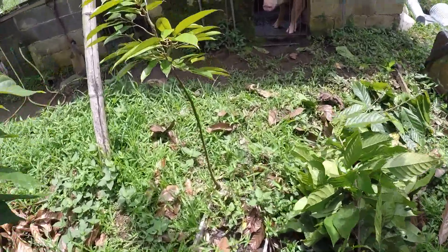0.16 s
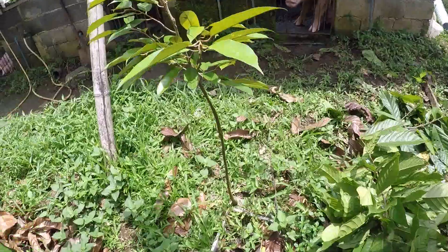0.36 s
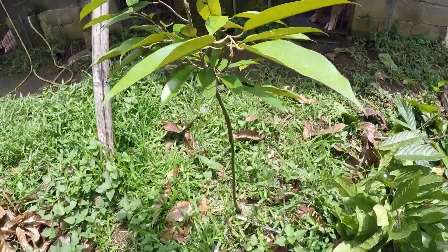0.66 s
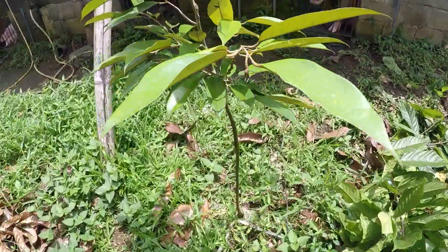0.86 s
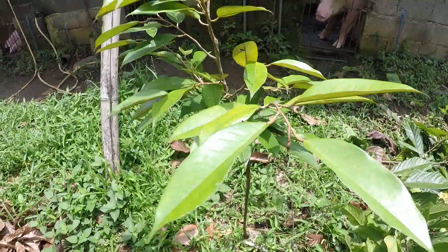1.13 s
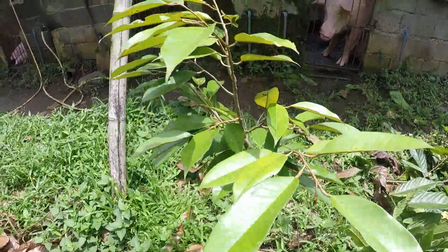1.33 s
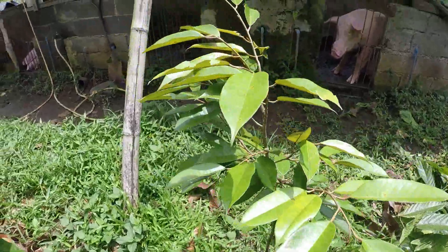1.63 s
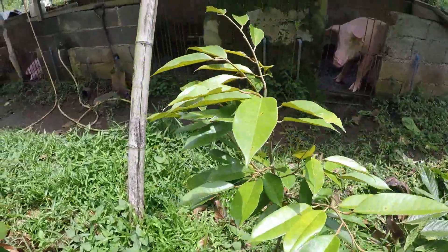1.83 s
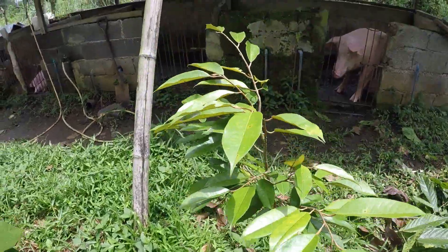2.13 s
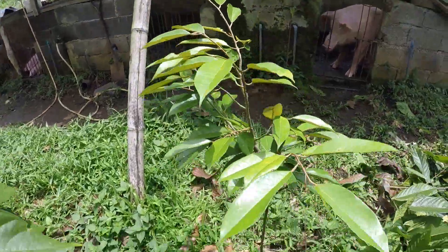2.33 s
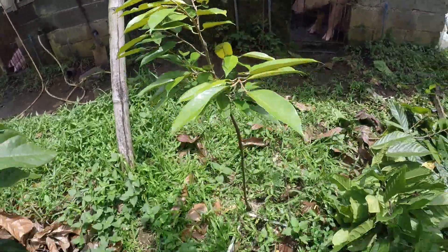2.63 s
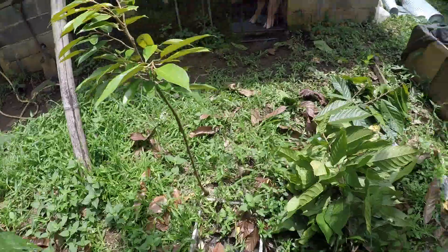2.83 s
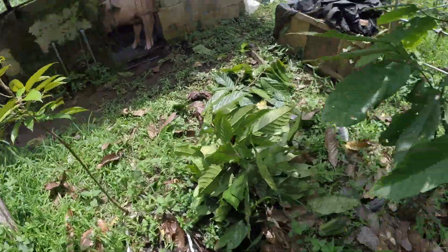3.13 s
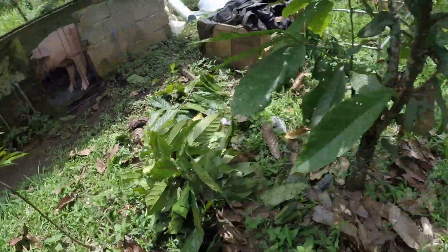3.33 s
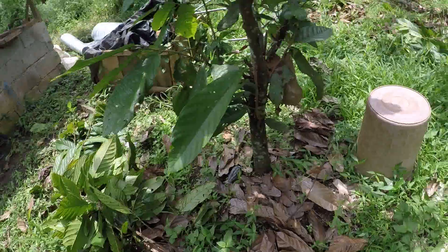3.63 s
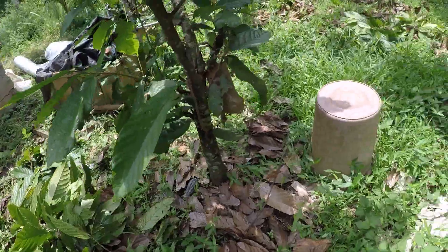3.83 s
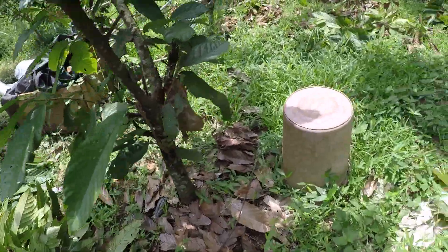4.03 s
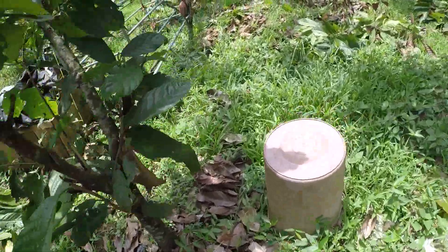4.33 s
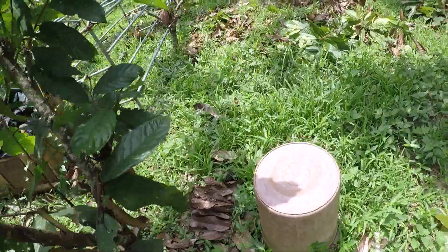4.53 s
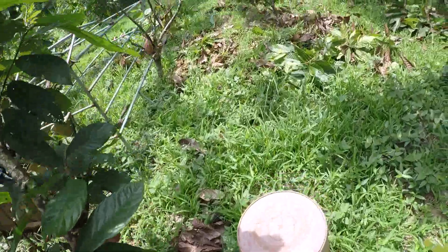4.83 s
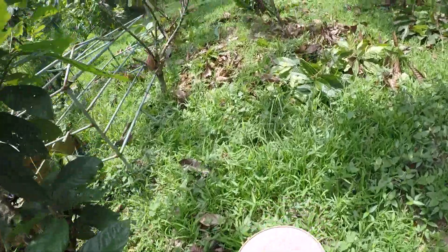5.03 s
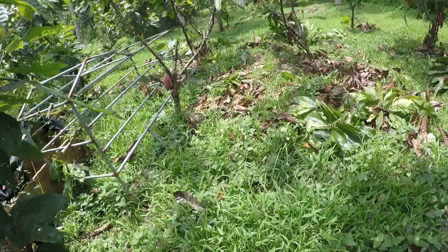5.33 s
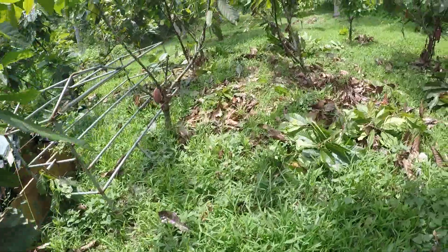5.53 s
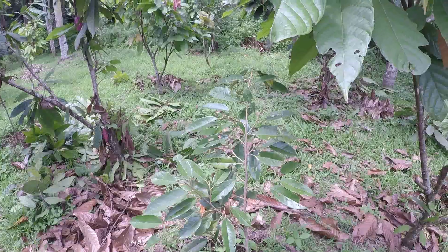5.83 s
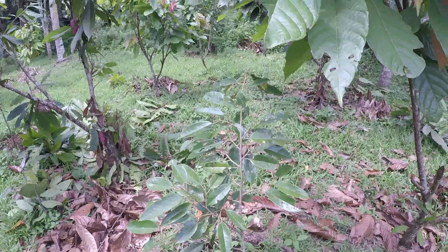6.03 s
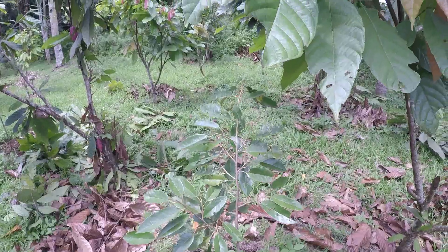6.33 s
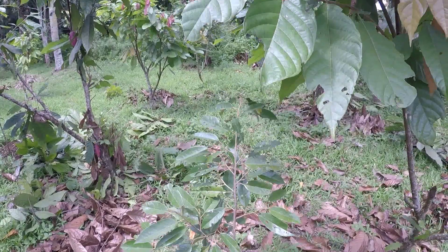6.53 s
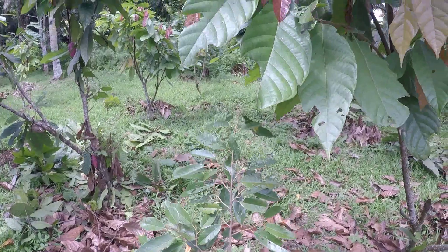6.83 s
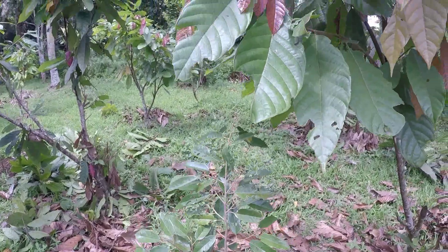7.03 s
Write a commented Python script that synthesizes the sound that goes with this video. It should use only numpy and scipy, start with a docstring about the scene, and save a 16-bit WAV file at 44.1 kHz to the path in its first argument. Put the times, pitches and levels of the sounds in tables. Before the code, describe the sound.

Footsteps rustle and snap through grass and dry leaves under low wind rumble as a pig grunts repeatedly; then an abrupt cut to a quiet grove.

```python
"""Leafy garden walk, a pig in its pen, then a calm grove

Heard close at the two ports of a small hand-held camera: feet stir grass and dry leaves (grainy noise,
bursts for snaps, short rings for ticks), and wind rumbles and thumps (low noise, falling blips).
A pig grunts from its concrete pen (pulse trains through resonances, with echoes; a noise burst adds a knock).
After a cut, a quiet mono grove fades in (two noise bands). Faint far calls are gliding sines."""
import sys
import numpy as np
from scipy import signal
from scipy.fft import rfft, irfft
from scipy.io import wavfile
from scipy.ndimage import uniform_filter1d

SR = 44100
rng = np.random.default_rng(int(sys.argv[2]) if len(sys.argv) > 2 else 0)


def wav_record(signal):
    """Record a signal, one row per channel, as 16-bit PCM in the file named by sys.argv[1]."""
    frames = np.transpose(np.atleast_2d(signal))
    bounded = np.clip(frames, -1, 1)
    # unit amplitude maps onto the largest positive 16-bit level
    quanta = np.round(bounded * 32767).astype(np.int16)
    wavfile.write(sys.argv[1], SR, quanta)


N = 316197
CUT_S = 5.742   # the garden ends and the grove begins


def from_db(db):
    """Gain of a level in dB."""
    return 10 ** (np.asarray(db) / 20)


def rms_one(x):
    """Scaled to rms 1."""
    return x / np.sqrt(np.mean(x ** 2) + 1e-20)


def in_time(rows):
    """One curve per column after the first (seconds), sample by sample."""
    s, *columns = np.transpose(rows)
    return [np.interp(np.arange(N) / SR, s, column) for column in columns]


def on_bins(points):
    """A table over frequency, read at every FFT bin along a log axis."""
    hz, value = np.transpose(points)
    bin_hz = np.arange(N // 2 + 1) * SR / N
    return np.interp(np.log(bin_hz + 1), np.log(hz + 1), value)


def coloured(x, spectrum):
    """Noise shaped by a relative spectrum that keeps the rms of white noise."""
    return irfft(rfft(x) * rms_one(from_db(on_bins(spectrum))), N)


def drift(rate):
    """Slow random wandering of rms about 1: smoothed noise made at every 40th sample."""
    r = np.exp(-80 * np.pi * rate / SR)
    noise = rng.standard_normal(N // 40 + 2002)
    slow = signal.lfilter([1], [1, -2 * r, r * r], noise)[2000:]   # drop the filter's start
    return np.interp(np.arange(N) / 40, np.arange(len(slow)), rms_one(slow))


def dying(clicks, t60):
    """Every click becomes an envelope losing 60 dB in t60 seconds; rows may have a decay each."""
    if np.ndim(t60):
        return np.array([dying(row, each) for row, [each] in zip(clicks, t60)])
    return signal.lfilter([1], [1, -from_db(-60 / (t60 * SR))], clicks + 1e-18)


def resonate(x, modes):
    """Parallel resonances (hz, width_hz, level_db) of alternating sign."""
    out = 0
    for k, (hz, width_hz, level_db) in enumerate(modes):
        r = np.exp(-np.pi * width_hz / SR)
        poles = [1, -2 * r * np.cos(2 * np.pi * hz / SR), r * r]
        out = out + (-1) ** k * from_db(level_db) * signal.lfilter([1 - r, 0, r - 1], poles, x)
    return out


def panned(seconds, level_db, pan_db):
    """Stereo clicks at the given moments; pan is left minus right."""
    clicks = np.zeros((2, N))
    clicks[:, (seconds * SR).astype(int)] = from_db(level_db + np.outer([.5, -.5], pan_db))
    return clicks


# the camera's two ports: (pitch_hz, left_lead_rad)
PORT_PHASE = [(20, -.2), (260, .1), (690, -2.3), (950, -3.4), (2330, -4.1), (4570, -6.3), (5340, -7.4),
              (8870, -8.3)]
# (pitch_hz, left_minus_right_db)
PORT_BALANCE = [(60, 1), (100, -3), (180, 9.5), (310, -4), (550, -0.5), (950, -5), (1650, -5), (2870, -1),
                (4990, -5), (8670, -5.5)]
# (pitch_hz, likeness), 1 when both ports hear the same
PORT_LIKENESS = [(40, 0.93), (150, 0.73), (300, 0.067), (1000, 0.64), (2500, 0.56), (5000, 0.45),
                 (9000, 0.27)]


def ports(pair):
    """Two draws of a sound become left and right: partly alike, unequal in level, shifted in phase."""
    first, second = rfft(pair)
    alike = np.clip(on_bins(PORT_LIKENESS), 0, 1)
    tilt = from_db(on_bins(PORT_BALANCE) / 2)
    right = alike * first + np.sqrt(1 - alike ** 2) * second
    lag = np.exp(-1j * on_bins(PORT_PHASE))
    return irfft([first * tilt, right / tilt * lag], N)


# wind at the ports, before their balance: (start_s, level_db)
WIND = [(0.0, -36), (0.83, -32), (1.01, -39), (1.21, -24), (1.25, -33), (2.16, -33.5), (2.19, -42.5),
        (2.24, -33), (2.86, -32.5), (2.94, -25.5), (3.13, -36), (3.8, -28), (3.85, -35.5), (3.97, -29.5),
        (4.44, -28), (4.73, -37), (4.99, -28), (5.74, -32)]
# relative spectrum of the rumble: (pitch_hz, level_db per Hz)
RUMBLE = [(8.8, -53), (15, -21), (32, -0.5), (56, 1.5), (82, -2.5), (190, -34.5), (282, -44.5), (322, -44),
          (500, -40.5), (650, -65.5), (1100, -120)]


def wind():
    """Low turbulence as shaped noise; its own wandering is partly evened out, its level follows a curve."""
    rumble = coloured(rng.standard_normal((2, N)), RUMBLE)
    wander = np.sqrt(uniform_filter1d(rumble ** 2, size=3000) + 2.0)
    return from_db(in_time(WIND)[0]) * rms_one(rumble / wander)


# relative spectrum of the garden's distant bed: (pitch_hz, level_db per Hz)
GARDEN = [(120, -16.5), (200, 0.5), (328, -8.5), (816, -13), (1280, -13), (4890, -19.5), (6020, -12.5),
          (9120, -24), (11900, -32.5), (20100, -120)]
GARDEN_DB = -60   # middle level, before the flicker and the ports


def garden():
    """Far leaves and insects as shaped noise, gently flickering."""
    flicker_db = 1.7 * drift(0.98)
    return from_db(GARDEN_DB + flicker_db) * coloured(rng.standard_normal((2, N)), GARDEN)


# steps and swishes close below the ports; rise and fall each span 20 dB:
# (loudest_s, rise_s, fall_s, hiss_db, crunch_body_db, sizzle_db)
STEPS = [(0.01, 0.068, 0.1, -46.5, -55.5, -53), (0.09, 0.045, 0.09, -39, -50, -37),
         (0.21, 0.095, 0.36, -53, -61.5, -59.5), (0.338, 0.054, 0.044, -42, -91, -54.5),
         (0.419, 0.066, 0.018, -34.5, -39.5, -47.5), (0.49, 0.14, 0.17, -34.5, -46, -46),
         (0.57, 0.13, 0.062, -38, -40, -53), (0.66, 0.1, 0.25, -50.5, -51.5, -66),
         (1.17, 0.22, 0.38, -51, -62.5, -65), (1.38, 0.044, 0.06, -48.5, -69, -64),
         (1.46, 0.072, 1, -58, -81, -83), (1.72, 0.014, 0.014, -66, -48, -54),
         (1.84, 0.081, 0.061, -43.5, -55, -57), (2.092, 0.21, 0.14, -37, -44, -47.5),
         (2.19, 0.051, 0.076, -45, -47, -57), (2.309, 0.16, 0.12, -44, -47.5, -52),
         (2.85, 0.5, 0.45, -54, -60.5, -63), (3.149, 0.018, 0.061, -48, -52.5, -45),
         (3.45, 0.79, 0.054, -53.5, -56.5, -62), (3.6, 0.13, 0.97, -60, -68.5, -65.5),
         (3.788, 0.027, 0.045, -45, -68, -53.5), (3.93, 0.033, 0.13, -42, -48, -52),
         (4.158, 0.15, 0.28, -48.5, -58.5, -52.5), (4.267, 0.028, 0.032, -43.5, -42.5, -43.5),
         (4.4, 1, 0.19, -50.5, -59.5, -61.5), (4.512, 0.16, 0.11, -45.5, -50.5, -52.5),
         (4.867, 0.074, 0.26, -47.5, -67, -56), (4.937, 0.06, 0.13, -47.5, -58, -57),
         (5.0, 0.2, 0.46, -53, -68, -62.5), (5.15, 0.4, 1, -53.5, -61.5, -64),
         (5.46, 0.11, 0.17, -49.5, -52, -55), (5.539, 0.13, 0.083, -45.5, -53.5, -57),
         (5.719, 0.25, 0.048, -51.5, -56.5, -65)]
# grass brushing the legs between steps: hiss_db, body_db, sizzle_db
BRUSH_DB = [-70.5, -65, -87]


def tent(t, peak_s, up_db_per_s, down_db_per_s):
    """Gain that climbs to 1 at the peak and falls after it, straight in dB."""
    return from_db(np.minimum(up_db_per_s * (t - peak_s), down_db_per_s * (peak_s - t)))


def tread():
    """Level of each leaf layer: every step swells and dies away, adding power to the steady brushing."""
    t = np.arange(0, N, 64) / SR
    power = from_db(BRUSH_DB)[:, None] ** 2
    for s, rise, fall, *layer_db in STEPS:
        shape = tent(t, s, 20 / max(rise, .01), 20 / max(fall, .01))
        power = power + (from_db(layer_db)[:, None] * shape) ** 2
    return [np.interp(np.arange(N) / SR, t, np.sqrt(p)) for p in power]


# relative spectra of the three leaf layers: (pitch_hz, level_db per Hz)
LEAF_HISS = [(1200, -12.5), (2000, -5), (3100, -7), (4600, -9), (6100, -3.5), (7000, -11), (8500, -35),
             (12000, -64.5)]
LEAF_BODY = [(250, -24), (500, 2), (800, 10), (1500, 8), (2500, 0.5), (4000, -20)]
LEAF_SIZZLE = [(5000, -49), (7000, -9), (8200, -14.5), (9200, -20), (11900, -42), (14500, -45),
               (16000, -61.5)]


def rustle(grains_per_s, spread_db, smooth, ticks_per_s, tick_share):
    """Noise broken into clumped grains and finer ticks: many small leaves crack under each step."""
    clumps = from_db(5.24 * drift(20))   # multiplies both rates

    def crackles(per_s, t60):
        struck = rng.random(N) < per_s * clumps / SR
        strength = from_db(spread_db * np.minimum(rng.exponential(1, N), 4))
        return rms_one(dying(struck * strength, t60))

    grains = crackles(grains_per_s, 0.023)
    fine = crackles(ticks_per_s, 0.004)
    envelope = rms_one(smooth + grains + tick_share * fine)
    crackle = envelope * rng.standard_normal((3, 2, N))
    parts = zip(tread(), crackle, (LEAF_HISS, LEAF_BODY, LEAF_SIZZLE))
    return sum(level * coloured(noise, spectrum) for level, noise, spectrum in parts)


# short noise bursts near the ports: snapping leaves and twigs, and a knock in the second grunt,
# levels before SNAP_GAIN: (start_s, bright_db, dull_db, left_minus_right_db)
SNAPS = [(0.018, -40, -65, -16), (0.07, -26, -69, -12), (0.1025, -28.5, -69, -13.5),
         (0.178, -33.5, -58, -5), (0.2235, -32, -51.5, 2.5), (0.2612, -36, -71, -9.5),
         (0.325, -36, -42, -10), (0.3716, -40, -59, -10), (0.459, -34, -34, -16), (0.998, -40, -57, 0),
         (1.1208, -36.5, -36, -3), (1.149, -34, -60, -1), (1.197, -32.5, -38, -5.5), (1.261, -41, -41, 0),
         (1.368, -36, -34.5, -2), (1.447, -38.5, -42, -1), (1.46, -34, -46, -1), (1.713, -39, -51.5, -15),
         (1.817, -37, -41, -9), (1.8407, -36, -36.5, -9), (1.897, -45, -64, -16), (2.179, -47, -36, -16),
         (2.261, -33.5, -70, -7), (2.305, -59, -44, -19), (2.351, -48, -47.5, -22), (2.781, -43, -70, -7),
         (3.066, -41.5, -49, -9), (3.1134, -44, -74, -13), (3.13, -44, -78, -17), (3.143, -35, -79, -9),
         (3.164, -41, -79, -19), (3.179, -50, -53, -5), (3.435, -54, -42, 16), (3.451, -32.5, -54, -1),
         (3.468, -33.5, -57, -3), (3.781, -47, -51, 7), (3.799, -32, -40.5, -2.5),
         (3.895, -41.5, -37, -0.5), (3.9214, -61, -28.5, 3), (4.129, -26.5, -27.5, 2.5),
         (4.159, -28, -32, -3.5), (4.214, -41, -63, 3), (4.245, -32, -50.5, 14), (4.2643, -30.5, -63, -29),
         (4.388, -41, -35, 4), (4.48, -34.5, -60, -3), (4.491, -30, -66, -13), (4.79, -37, -82, 13),
         (4.831, -44, -60, 3), (4.934, -39.5, -42, -12.5), (5.1706, -51, -70, -10), (5.417, -48, -38.5, -9),
         (5.4574, -29.5, -34.5, -3), (5.726, -39, -31.5, 2)]
# relative spectra of both parts: (pitch_hz, level_db per Hz)
SNAP_BRIGHT = [(1500, -24), (3000, -3.5), (4600, -5), (6100, 4), (8000, -1), (9200, -13), (11900, -26.5),
               (15000, -33)]
SNAP_DULL = [(400, -20), (1000, -15), (2000, -15), (3300, -14.5), (5000, -23.5), (9000, -62.5)]
CRACK_DB, CRACK_T60_S = 1, 0.0011   # first instant of a burst, relative to its bright part
SNAP_GAIN = 0.28


def snaps():
    """Each snap or knock is a short noise burst, bright and dull part dying at their own pace."""
    s, bright_db, dull_db, pan_db = np.transpose(SNAPS)
    noise = ports(rng.standard_normal((2, N)))
    clicks = panned(s, bright_db, pan_db)
    envelope = dying(clicks, 0.032) + from_db(CRACK_DB) * dying(clicks, CRACK_T60_S)
    bright = coloured(envelope * noise, SNAP_BRIGHT)
    dull = coloured(dying(panned(s, dull_db, pan_db), 0.13) * noise, SNAP_DULL)
    return SNAP_GAIN * (bright + dull)


# puffs of air that hit the ports; kind +1 pushes them together, -1 rocks them against each other:
# (start_s, left_db, right_db, kind, pitch_drop_hz)
THUMPS = [(0.134, -57, -45, 1, 420), (0.157, -48, -42, 1, 420), (0.253, -56, -38, 1, 420),
          (0.293, -41, -41, 1, 352), (0.591, -55, -55, 1, 420), (0.196, -22.5, -19.5, -1, 890),
          (0.2224, -43, -33, -1, 1090), (0.308, -26.5, -22.5, -1, 1080), (0.389, -32, -28, -1, 404),
          (0.4938, -31, -26.5, -1, 724), (0.569, -32, -28.5, -1, 880), (0.7491, -32, -27, -1, 1080),
          (0.848, -43, -56, 1, 420.0), (1.783, -42.5, -47, 1, 410), (1.894, -42, -46, 1, 397),
          (2.22, -38, -44, -1, 420.0), (2.298, -28, -26.5, -1, 448), (2.4535, -34, -38, -1, 440),
          (2.581, -39, -32.5, 1, 400), (2.7716, -33, -39, -1, 427), (2.997, -32.5, -41, 1, 417),
          (3.251, -36.5, -39, 1, 380), (3.529, -45, -41, 1, 416), (4.879, -38, -46, 1, 416),
          (5.3558, -42, -43, 1, 410), (5.4901, -33.5, -38, 1, 384)]
# where the blip of a puff ends, by kind: settle_hz
SETTLE_HZ = {1: 188, -1: 150.}


def thumps():
    """A puff rocks the membranes: a blip whose pitch drops in milliseconds, then a ragged flutter of air."""
    out, t = np.zeros((2, N)), np.arange(SR // 5) / SR
    swell = (t / 0.0036 * np.exp(1 - t / 0.0037)) ** 1.12
    flutter_swell = t / 0.028 * np.exp(-t / 0.021)
    band = signal.butter(2, [150., 800.], "band", fs=SR, output="sos")
    ragged = signal.sosfilt(band, rng.standard_normal((len(THUMPS), len(t))))
    for (s, left_db, right_db, kind, drop_hz), flutter in zip(THUMPS, ragged):
        hz = SETTLE_HZ[kind] + drop_hz * np.exp(-t / 0.0019)
        # rocked ports start opposed; the low end of the blip falls back in step
        apart = np.pi * (kind < 0) * (1 - np.exp(-((hz - 150.) / 60.) ** 2))
        blip = swell * np.sin(2 * np.pi * np.cumsum(hz) / SR + [apart, 0 * t])
        blip += 0.77 * flutter * flutter_swell * [[np.sign(kind)], [1]]
        out[:, round(s * SR):][:, :len(t)] += from_db([[left_db], [right_db]]) * blip
    return out


# small hollow ticks among the leaves: (start_s, pitch_hz, level_db, left_minus_right_db)
TICKS = [(0.136, 1300, -43, -15), (0.18, 2460, -37, -4), (0.223, 810, -38.5, -2), (0.668, 1480, -40, -5),
         (2.181, 1030, -50, -3), (2.183, 1730, -37, -3), (2.33, 900, -43, -9), (3.048, 1200, -47, -8),
         (3.21, 1400, -43, -12), (3.311, 1590, -42, 0), (4.494, 2200, -40, -3)]
TICK_CYCLES = 19   # until the ring has lost 60 dB


def ticks():
    """Each tick is a short ring at its own pitch."""
    out, t = np.zeros((2, N)), np.arange(SR // 20) / SR
    for s, hz, level_db, pan_db in TICKS:
        ring = np.sin(2 * np.pi * hz * t) * from_db(-60 * t * hz / TICK_CYCLES)
        sides = from_db([[level_db + pan_db / 2], [level_db - pan_db / 2]])
        out[:, round(s * SR):][:, :len(t)] += sides * ring
    return out


# chest resonances: (multiple of the chest pitch, width_hz, level_db)
CHEST = [(1., 12.4, 10.5), (1.209, 23.3, 0.5)]
CHEST_ATTACK_S, CHEST_FADE_DB_PER_S = 0.018, 143   # the fade counts from the end of the pulses


def chest_ring(drive, cycle, chest_hz):
    """Each pulse rings the chest at the pitch of that moment."""
    rings = 0
    for k, hz in enumerate(chest_hz):
        modes = [(hz * multiple, *rest) for multiple, *rest in CHEST]
        rings = rings + resonate(drive * (cycle == k), modes)
    return rings


# broad leak beside the peaks of lower snout, upper snout and rasp: (pitch_hz, width_hz, level_db)
OPEN_MOUTH = [(1300, 470, -16.5), (1770, 890, -32), (2880, 1100, -24.5)]
CLOSED_S, OPEN_DAMPING_DB_PER_S = 0.017, 1500   # airiness lessens the damping
SNOUT_SHIFT = 0.025   # spread of the share by which resonances move from pulse to pulse


def mouth_ring(drive, cycle, t, beats, modes, leak, airy):
    """The snout rings freely after a pulse, then the opening throat damps it for up to 10 ms."""
    shifts = 1 + SNOUT_SHIFT * rng.standard_normal((12, 4))
    damping_db_per_s = OPEN_DAMPING_DB_PER_S * (1 - airy) ** 2
    rings = 0
    for n, beat in enumerate(beats):
        moved = [(hz * by, *rest) for (hz, *rest), by in zip(modes, shifts[n])]
        damping = from_db(-damping_db_per_s * np.clip(t - beat - CLOSED_S, 0, .01))
        rings = rings + damping * resonate(drive * (cycle == n), [*moved, leak])
    return rings


# throat resonances: (pitch_hz, width_hz)
THROAT = [(200, 51), (300, 43), (410, 53), (505, 24)]
THROAT_BREATHY, THROAT_T60_S = 0.098, 0.63   # its air lingers
THROAT_ATTACK_S = 0.035   # slope of the swell, which starts from a gain of 0.27
CHEST_SAG_DB_PER_S = 56.5   # the first knocks are the hardest
CHEST_LEAD_S = .015   # the chest starts before the snout opens
# breath noise in chest, lower snout, upper snout, rasp: share (airiness scales all but the chest)
AIR_SHARE = [.015, .15, .15, .2]
# its decay, same layers: t60_s (airiness lengthens the rasp's)
AIR_T60_S = [
    [.4],
    [.12],
    [.1],
    [.09],
]


def grunt(times, row, airy, effort, throat_db, snout_modes, rasp_modes):
    """Slow uneven pulses knock chest and throat; the air after each pulse rasps through the snout."""
    (first, gap, pulses_end, per_s), (pan_db, chest_db) = times, row
    start, size = round(first * SR), SR // 2
    beats = np.append(first, np.arange(first + gap, pulses_end, 1 / per_s))
    at = (beats * SR).astype(int) - start + 1
    t = first + np.arange(size) / SR
    cycle = np.searchsorted(at, np.arange(size), side="right") - 1   # which pulse is sounding

    s, chest_hz, *mouth_db = np.transpose(effort)
    efforts_db = [-CHEST_SAG_DB_PER_S * (beats - first)]
    efforts_db += [np.interp(beats, s, level_db) for level_db in mouth_db]
    uneven_db = rng.standard_normal((4, 12))[:, :len(at)]
    pulses = np.zeros((4, size))   # chest, lower snout, upper snout, rasp
    pulses[:, at] = from_db(efforts_db + uneven_db)

    # breath is mostly shared by both ports
    breath = rng.standard_normal((4, size)) + 0.28 * rng.standard_normal((2, 4, size))
    air_share = np.multiply(AIR_SHARE, [1, airy, airy, airy])[:, None]
    air_t60 = np.multiply(AIR_T60_S, [[1], [1], [1], [1 + 3 * airy]])
    knocks = pulses * [[1], [1], [1], [1 - airy]]
    drive = knocks + air_share * dying(pulses, air_t60) * breath
    out = np.zeros((2, N))

    def add(sound, level, early=0):
        """Scaled by its spread over the pulses, then set to its level."""
        spread = np.std(sound[:, :at[-1] + SR // 30])
        out[:, start - early:][:, :size] += level * sound / spread

    chest = chest_ring(drive[:, 0], cycle, np.interp(beats, s, chest_hz))
    fade = from_db(-CHEST_FADE_DB_PER_S * np.maximum(t - pulses_end, 0))
    shape = np.minimum((t - first) / CHEST_ATTACK_S, 1) * fade
    add(chest, from_db(chest_db) * shape, round(CHEST_LEAD_S * SR))

    layers = [*[[(*mode, 0)] for mode in snout_modes], rasp_modes]
    for k, modes in enumerate(layers):
        rings = mouth_ring(drive[:, k + 1], cycle, t, beats, modes, OPEN_MOUTH[k], airy)
        add(rings, from_db(mouth_db[k].max()))

    lingering = pulses[0] + THROAT_BREATHY * dying(pulses[0], THROAT_T60_S) * breath[:, 0]
    swell = np.minimum(0.27 + (t - first) / THROAT_ATTACK_S, 1)
    for mode, level_db in zip(THROAT, throat_db):
        add(resonate(lingering, [(*mode, 0)]), from_db(level_db) * swell)
    return out * from_db([[pan_db / 2], [-pan_db / 2]])


# slow throat pulses, one row per grunt: (first_pulse_s, gap_to_second_s, pulses_end_s, pulses_per_s)
PULSE_TIMES = [(0.440, .028, .565, 33.3), (1.074, .016, 1.17, 32.), (2.781, .032, 2.95, 30.8),
               (3.572, .033, 3.71, 31.3), (4.344, .030, 4.445, 30.2), (4.916, .030, 5.075, 33.7)]
# side and chest, one row per grunt: (left_minus_right_db, chest_db)
GRUNTS = [(-3.5, -32.5), (-1.5, -38), (1.5, -37.5), (3, -37), (1.5, -35.5), (0.5, -34.5)]
# one share per grunt: airiness of snout and rasp
AIRINESS = [.4, .2, .7, .8, .2, .22]
# effort through each grunt; the highest dB of a column sets the level of its layer:
# (start_s, chest_pitch_hz, lower_snout_db, upper_snout_db, rasp_db)
EFFORT = [
    [(.44, 131, -54, -58, -47), (.5, 122, -63, -62, -41.5), (.53, 116.5, -49.5, -57, -45.5),
     (.56, 114, -64, -73, -62)],
    [(1.074, 128, -68, -72, -54.5), (1.09, 122.4, -70, -65, -55), (1.12, 135.4, -54.5, -56.5, -42),
     (1.152, 150., -63, -62, -47)],
    [(2.781, 115, -78, -74, -65), (2.813, 138, -70, -72, -53), (2.845, 150., -71, -65, -54),
     (2.878, 143, -61, -58.5, -51), (2.91, 132, -59, -62, -82), (2.942, 120, -73, -79, -86)],
    [(3.572, 121.3, -61.5, -61, -52), (3.605, 133, -57, -65, -62), (3.637, 150., -54, -69, -67),
     (3.668, 141, -68, -69, -70), (3.70, 136, -68, -75, -81)],
    [(4.344, 130, -58.5, -57.5, -50.5), (4.374, 127.5, -61, -52.5, -52), (4.407, 143, -52, -51, -54),
     (4.44, 134, -55.5, -61, -62)],
    [(4.917, 127, -60.5, -61, -63), (4.947, 122, -62, -71, -51.5), (4.976, 127.4, -59, -76, -62),
     (5.006, 124.5, -51, -54.5, -48), (5.035, 134, -55.5, -59, -54), (5.065, 124, -64, -73.5, -69)],
]
# one row per grunt: level_db of each throat resonance
THROAT_DB = [(-65.5, -67, -55, -62.5), (-51, -64.5, -67, -62.5), (-53.5, -63, -88, -72),
             (-58.5, -63, -64, -65), (-63, -59, -58.5, -63), (-60.5, -78, -62.5, -72)]
# lower and upper snout resonance of each grunt: (pitch_hz, width_hz)
SNOUT = [
    [(1172, 38), (1520, 90)],
    [(1170, 21), (1700, 40)],
    [(1103, 35), (1426, 66)],
    [(1133, 37), (1560, 50)],
    [(1180, 47), (1520, 30)],
    [(1128, 40), (1500, 29)],
]
# rasp resonances of each grunt: (pitch_hz, width_hz, level_db)
RASP = [
    [(2330, 400, -2), (3230, 91, 0), (3430, 100, -15)],
    [(2340, 230, -1.5), (2870, 180, 5.5), (3300, 140, 8), (5200, 300, -8)],
    [(2280, 72, -0.5), (2770, 100, -6), (3140, 89, 5.5)],
    [(2230, 170, -0.5), (2680, 130, 4), (3200, 130, 7)],
    [(2270, 90, 0.5), (3030, 120, -10), (3270, 150, 0)],
    [(2215, 88, 12.5), (2800, 74, 5.5), (3320, 160, 2.5)],
]
# concrete walls of the pen: (delay_s, level_db)
PEN_ECHOES = [(.019, -13.5), (.043, -26.5), (.113, -22), (.16, -19)]
PIG_LAG_S = 0.00011   # the grunts reach the right port this much later


def pig():
    """The camera turns, so each grunt arrives from its own side; the pen walls send back dull echoes."""
    rows = zip(PULSE_TIMES, GRUNTS, AIRINESS, EFFORT, THROAT_DB, SNOUT, RASP)
    calls = sum(grunt(*row) for row in rows)
    dull = signal.sosfilt(signal.butter(2, 1800., fs=SR, output="sos"), calls)
    for delay, level_db in PEN_ECHOES:
        calls = calls + from_db(level_db) * np.roll(dull, round(delay * SR), axis=1)
    bin_hz = np.arange(N // 2 + 1) * SR / N
    late = np.exp(-2j * np.pi * PIG_LAG_S * bin_hz)
    return [calls[0], irfft(rfft(calls[1]) * late, N)]


# faint far-off calls, near-pure notes, levels before swell and waver:
# (start_s, end_s, start_pitch_hz, end_pitch_hz, level_db)
FAR_CALLS = [(0.864, 0.924, 5580, 5540, -61.5), (0.905, 1.037, 6100, 6400, -62),
             (3.337, 3.367, 1150, 1150, -51), (3.417, 3.458, 1260, 1000, -54.5),
             (4.767, 4.863, 620, 595, -59), (6.8, 6.957, 590, 615, -71), (6.86, 7.093, 1000, 968, -72),
             (7.068, 7.25, 984, 954, -68)]
CALL_WAVER = 0.01   # rms share by which the pitch shakes before the cut


def far_calls():
    """Gliding sines that swell and fade, wavering in pitch and level before the cut, steady after it."""
    out, before_cut = np.zeros(N), np.arange(N) < CUT_S * SR
    waver = from_db(5.0 * drift(90) - 5.0)
    shake = 1 + CALL_WAVER * drift(165) * before_cut
    for start, end, start_hz, end_hz, level_db in FAR_CALLS:
        along = np.linspace(0, 1, round((end - start) * SR))
        glide_hz = start_hz + (end_hz - start_hz) * along
        shaken_hz = glide_hz * np.resize(shake[round(start * SR):], len(along))
        phase = 2 * np.pi * np.cumsum(shaken_hz) / SR
        swell = np.sqrt(2 * np.sin(np.pi * along) + 1e-9)
        note = from_db(level_db) * swell * np.sin(phase)
        span = out[round(start * SR):][:len(along)]
        span += note[:len(span)]
    return out * np.where(before_cut, waver, 1)


# the grove: (start_s, air_db, insects_db)
GROVE = [(5.79, -78.5, -102), (5.83, -57, -102), (5.98, -50, -88.5), (6.2, -50, -76.5), (6.5, -50.5, -74),
         (6.8, -49.5, -72.5), (7.17, -49.5, -73)]
# relative spectra of its air and insects: (pitch_hz, level_db per Hz)
GROVE_AIR = [(12, -31), (22, 3.5), (48, -0.5), (87, -5), (115, -11), (180, -11.5), (335, -21), (600, -25.5),
             (1100, -31.5), (2300, -38), (3000, -48), (4000, -49), (7000, -56.5), (9100, -70),
             (15400, -120)]
GROVE_INSECTS = [(3200, -13.5), (5500, -12), (7400, -12.5), (8400, -7.5), (10000, -8), (12000, -17),
                 (14500, -22), (16000, -40)]


def grove():
    """Soft air and a distant band of insects, both shaped noise, alike in both channels."""
    air_db, insects_db = in_time(GROVE)
    air_noise, insect_noise = rng.standard_normal((2, N))
    air = from_db(air_db) * coloured(air_noise, GROVE_AIR)
    insects = from_db(insects_db) * coloured(insect_noise, GROVE_INSECTS)
    return air + insects


def scene():
    """The garden up to the cut, then the grove; far calls in both."""
    leaves = rustle(grains_per_s=420.0, spread_db=0.5, smooth=1.0, ticks_per_s=200., tick_share=0.59)
    near = wind() + garden() + leaves
    garden_walk = ports(near) + snaps() + thumps() + ticks() + pig()
    return np.where(np.arange(N) < CUT_S * SR, garden_walk, grove()) + far_calls()


def record(dry):
    """A steep low-pass removes the top: 60 dB down from 15300 Hz."""
    return signal.sosfilt(signal.cheby2(12, 60, 15300, fs=SR, output="sos"), dry)


dry = scene()
out = record(dry)
wav_record(out)
```